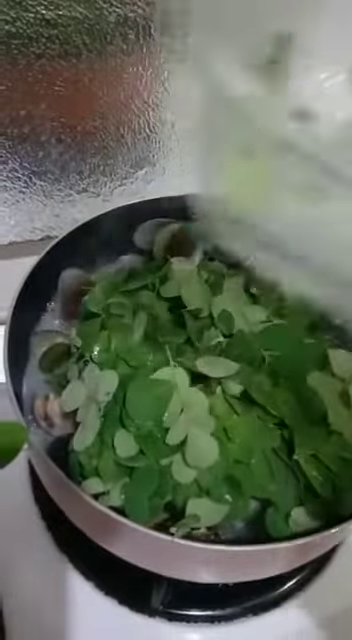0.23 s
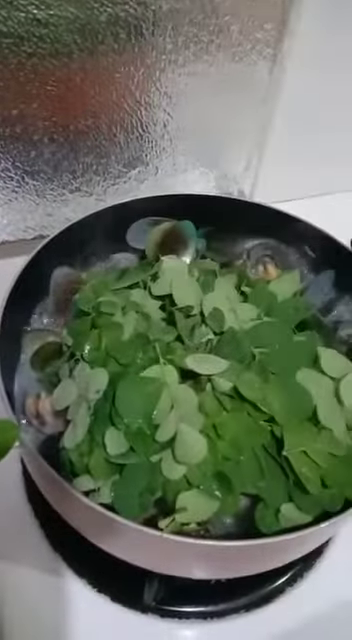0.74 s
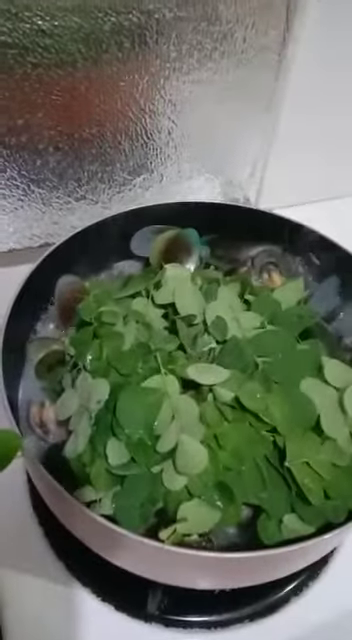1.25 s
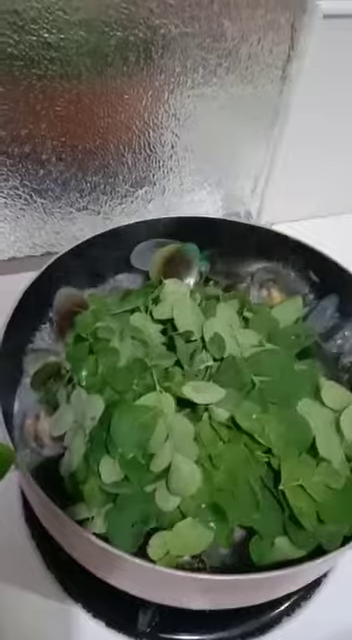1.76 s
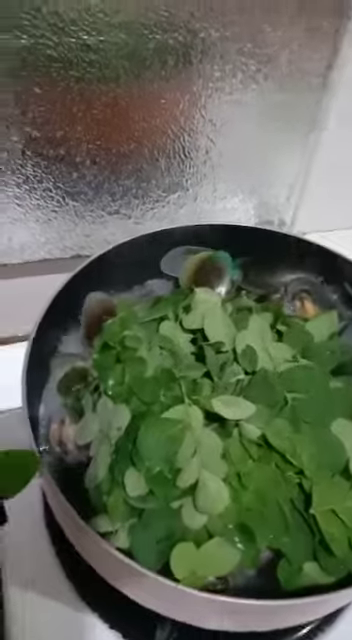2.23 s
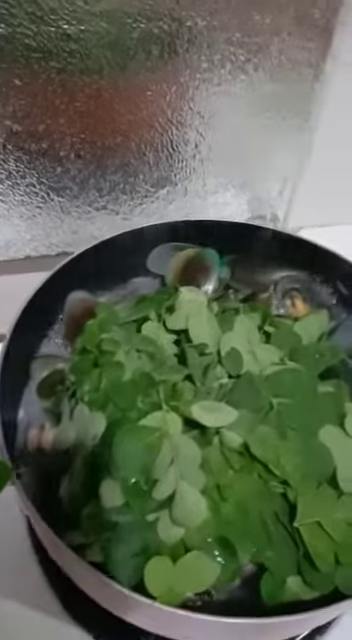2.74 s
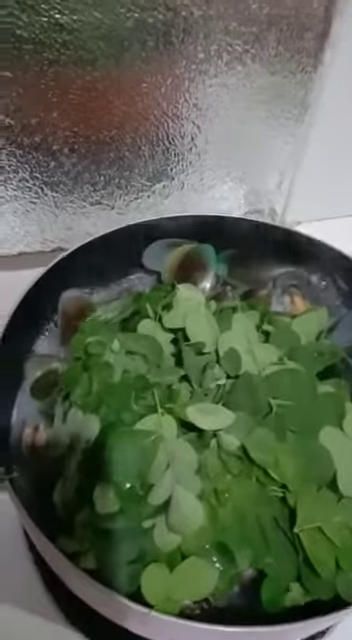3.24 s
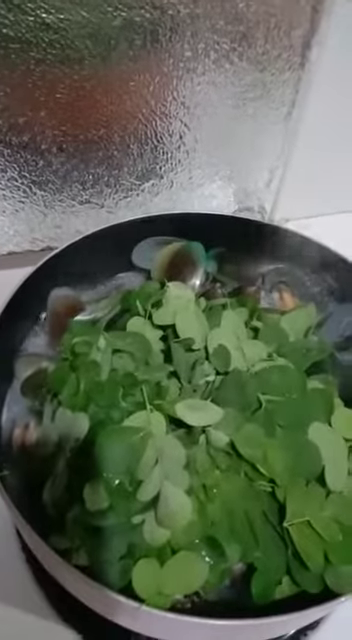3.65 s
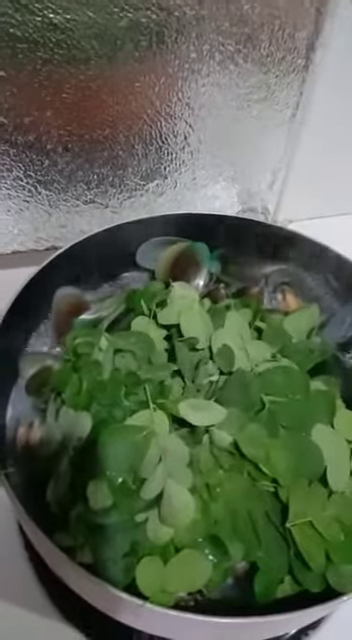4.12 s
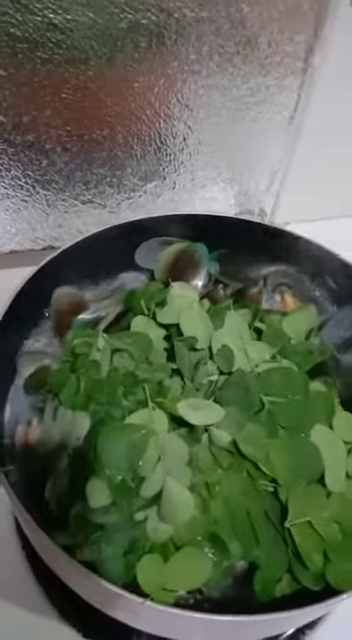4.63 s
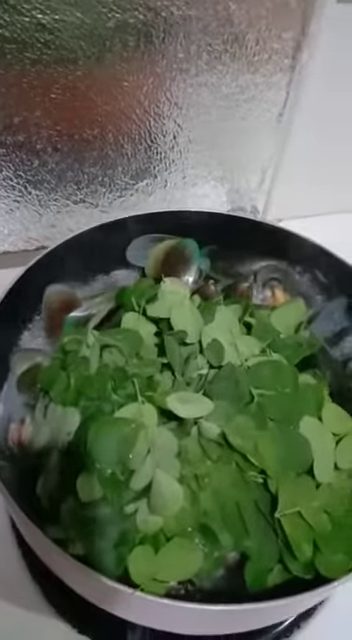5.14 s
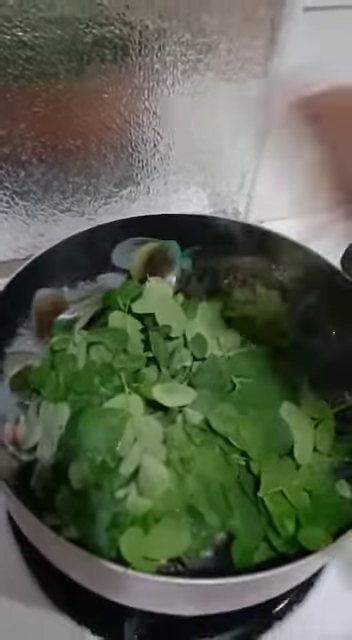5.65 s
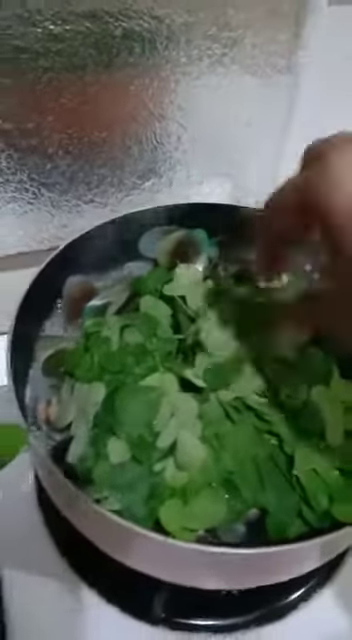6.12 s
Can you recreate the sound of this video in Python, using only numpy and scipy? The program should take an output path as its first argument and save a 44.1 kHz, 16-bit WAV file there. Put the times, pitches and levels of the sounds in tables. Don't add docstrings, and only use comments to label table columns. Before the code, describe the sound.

Faint low hum and gentle boiling run throughout, with hollow plopping bubbles, tiny taps on the pot wall and airy steam. After about a second a metal bowl strikes the counter with one hard, brief clang. Lighter utensil taps and scrapes follow, including two sharp ringing knocks in the middle. The last seconds are mostly bubbling and little spits, heard close on a boxy phone microphone in a tiled kitchen.

```python
import sys
import numpy as np
from scipy import signal
from scipy.fft import rfft, irfft
from scipy.io import wavfile
from scipy.ndimage import uniform_filter1d

SR = 44100
rng = np.random.default_rng(int(sys.argv[2]) if len(sys.argv) > 2 else 0)


def store_wav(level_fs):
    pcm = np.round(np.clip(np.atleast_2d(level_fs), -1, 1) * 32767)
    wavfile.write(sys.argv[1], SR, pcm.T.astype(np.int16))


def gain_from_db(level_db):
    decades = np.asarray(level_db, float) / 20
    return 10 ** decades


N = 281490

# t/s, level/dB
BOIL = [(0.0, -0.5), (0.25, 0.5), (0.57, -8), (1.2, -2.5), (1.5, 6.5), (1.8, -5.5), (2.4, 0.5), (2.63, 0.5),
        (2.95, 8.5), (3.3, 0.5), (4.1, -2), (4.53, -1), (4.85, 7.5), (5.1, -1.5), (5.6, 0), (6.38, -9.5)]
# f/Hz, density/(dB per Hz)
WASH = [(18, -32.5), (30, -29), (124, 2), (184, -30), (239, -7), (426, -10.5), (962, -11.5), (1250, -9.5),
        (1540, -18), (5590, -20.5), (6380, -24), (13300, -40.5), (14800, -26.5), (16000, -32)]
# f/Hz, density/(dB per Hz)
STEAM = [(3240, -38), (5500, -2.5), (6420, -4.5), (7090, 5), (8080, -5.5), (9690, 0), (12500, -13),
         (16200, -40), (22000, -120)]
# t/s, lift/dB
PUFFS = [
    (2.4, -1),
    (3.5, 3.5),
    (4.15, 1.5),
    (4.85, 5),
]
# t/s, length/s, f/Hz, level/dB rms
WHISTLES = [
    (0.812, 0.083, 885, -69),
    (0.875, 0.18, 977, -64),
    (2.733, 0.11, 1024, -62.5),
]
# t/s, level/dB, f/Hz
POPS = [(0.02, -42.5, 1180), (0.194, -41, 1250), (0.2592, -45, 1210), (0.3049, -34, 1217),
        (0.396, -41.5, 1240), (0.51, -42.5, 1195), (0.664, -42, 1284), (0.9152, -38, 1223),
        (1.0096, -39, 1240), (1.126, -40.5, 1260), (1.724, -34.5, 1256), (1.7772, -32.5, 1175),
        (2.254, -42, 1350), (2.4713, -41.5, 1240), (2.6494, -34.5, 1230), (2.8, -39, 1213),
        (2.9368, -32.5, 1224), (2.9878, -27.5, 1245), (3.259, -44, 1286), (3.523, -39, 1270),
        (4.4686, -31.5, 1243), (4.551, -41, 1172), (4.6975, -38.5, 1190), (4.805, -37, 1260),
        (4.9384, -35.5, 1245), (5.035, -38.5, 1242), (5.1937, -37, 1258), (5.71, -37.5, 1228),
        (5.77, -35.5, 1283), (5.927, -37.5, 1254)]
# f/Hz, level/dB rms
PAN_MODES = [(1760, -69), (1880, -69.5), (2270, -70), (2850, -71.5), (3170, -67.5), (3740, -70.5),
             (5080, -69.5), (5620, -72), (7150, -79.5), (9200, -78.5), (10400, -78)]
# f/Hz, width/Hz, lift/dB
HOLLOW = [(1240, 100, 18), (1870, 1400, 11), (3150, 800, 9), (3720, 40, 16), (5630, 1240, 10.5),
          (6370, 490, -21.5), (7700, 170, 17), (7830, 900, -7), (8900, 340, 13)]
# t/s, level/dB, centre f/Hz
THUDS = [
    (.47, -46, 430),
    (1.5, -45.5, 476),
    (2.5, -48, 684),
    (2.57, -46, 610),
    (2.75, -47, 617),
    (2.89, -42, 574),
    (4.94, -47, 354),
    (5.76, -46.5, 408),
    (5.96, -46, 412),
]
# t/s, level/dB
SPITS = [
    (1.724, -57),
    (1.9669, -48),
    (3.4897, -44),
    (3.5294, -52),
    (4.2444, -52),
    (4.787, -43.5),
    (4.878, -45),
    (4.903, -43),
    (6.0935, -59),
]
# f/Hz, level/dB, t60/s, pair split/Hz (negative: starts opposed and swells)
BOWL_MODES = [(1140, -9, 0.16, 24), (1265, -7.5, 0.19, 47), (2160, -21, 0.42, 94), (2620, -3, 0.057, 89),
              (2635, 8, 0.045, 129), (3350, -10.5, 0.31, -6), (3860, -28, 0.052, 22),
              (5070, -13, 0.18, -17), (6750, -4.5, 0.12, -1), (8355, -19, 0.17, 35), (9380, -17, 0.095, 9),
              (9900, -29, 0.18, 12), (10490, -26.5, 0.22, 11), (11570, -37, .18, 10), (12257, -39, .08, 30),
              (14280, -36, 0.12, 12)]
# f/Hz, density/(dB per Hz)
BOWL_CONTACT = [(150, -41), (250, -27), (1270, 8), (1560, -1), (1920, 3.5), (3050, 0), (3380, 0.5),
                (6260, -19), (6940, -35), (7300, -31), (9610, -33), (15000, -78)]
# t/s, ring level/dB, crack level/dB, hardness/(dB per octave)
BOWL_HITS = [
    (1.3178, -19, -2.5, -0.63),
    (1.863, -57, -55, -0.5),
    (3.985, -60.5, -60, 7),
]
# f/Hz, level/dB, t60/s, pair split/Hz
LADLE_MODES = [(524, -34, 0.53, 5.9), (643.6, -22, 0.28, 4.8), (893, -41, 0.11, 9.8), (1111, -6, 0.14, 26),
               (1256, -2.5, 0.041, 4.9), (1850, -9, 0.24, 5), (2680, -49, 0.075, 22), (3350, -16, 0.075, 4),
               (3690, -8.5, 0.039, 5), (4620, -31, 0.13, 50)]
# f/Hz, density/(dB per Hz)
LADLE_CONTACT = [(180, -27), (300, -24.5), (1150, 0), (1610, -12), (2690, -10.5), (3090, -26), (3660, -1),
                 (4140, -27), (9670, -25), (12000, -66), (15600, -98), (22000, -120)]
# t/s, ring level/dB, crack level/dB, hardness/(dB per octave)
LADLE_HITS = [
    (1.876, -37, -41, -4.5),
    (1.888, -54, -36, -3),
    (2.037, -40.5, -46, -1.5),
    (2.052, -48, -35, -4.5),
    (3.086, -41, -31.5, -4),
    (3.382, -28, -36, 1),
    (3.558, -46.5, -35.5, -4.5),
    (3.728, -51.5, -50, -7),
    (3.9915, -30, -29, -2),
    (4.119, -49, -35, -9),
]
# t/s, level/dB, f/Hz
CLONKS = [
    (3.3826, -14.5, 1000),
    (3.9924, -17, 1050),
]
# t/s, level/dB, f/Hz, ring/s
PINGS = [(1.34, -36.5, 3335, 0.24), (1.862, -52, 9330, 0.026), (1.863, -60, 11640, .025),
         (1.953, -37.5, 3430, .04), (1.99, -41.5, 3350, .03), (2.056, -46, 1850, .13),
         (2.711, -48, 3150, 0.015), (3.079, -48, 5130, 0.018), (3.08, -58, 9900, .025),
         (3.382, -48.5, 8300, 0.014), (3.384, -57, 10100, .015), (3.978, -39, 3700, 0.04),
         (3.982, -49, 8400, 0.018), (3.991, -49, 9560, .023)]
# t/s,
# level/dB, centre f/Hz
KNOCKS = [(0.402, -46.5, 3350), (0.49, -46, 1450), (1.052, -45, 3000), (1.3175, -7.5, 2430),
          (1.5723, -44, 2030), (1.774, -42, 2040), (1.862, -39, 1230), (1.875, -28, 1910),
          (1.956, -34, 3500), (2.28, -41, 1090), (2.6743, -40, 4440), (2.806, -41.5, 1870),
          (2.899, -44, 2250), (2.972, -42, 1880), (2.998, -47, 1810), (3.014, -36.5, 1960),
          (3.079, -34, 2260), (3.601, -36.5, 2840), (3.726, -42.5, 1940), (4.3385, -36.5, 2100),
          (4.461, -46, 1850), (4.517, -43, 2030), (4.793, -46, 5700), (4.884, -54, 14000),
          (4.939, -46, 1740), (5.196, -41.5, 2130), (5.768, -45, 1700), (5.94, -44.5, 1580),
          (6.095, -57, 13500)]
# t/s, level/dB, centre f/Hz
SCRAPES = [
    (1.953, -39, 4040),
    (2.975, -33.5, 660),
    (2.978, -34.5, 2030),
    (3.08, -42, 2000),
    (3.09, -47, 5200),
    (3.09, -41, 724),
    (3.385, -37, 2860),
    (3.6, -45, 410),
    (3.997, -45, 2500),
]
# f/Hz, t60/s
KITCHEN = [(300, 1), (1000, 0.31), (2500, 0.24), (5000, 0.27), (10000, 0.29)]
# f/Hz, steady level/dB rms, wavering level/dB rms, wavering width/Hz
HUM = [(57.8, -68, -81, 3.7), (121.4, -61, -59, 38), (239.4, -63.5, -65, 30.5), (355, -85, -66.5, 20.7),
       (623, -102, -67, 135)]
# f/Hz, density/(dB per Hz)
SIDE_HISS = [(29, -40), (55, -10), (122, -2), (809, -8.5), (1250, 2), (1550, -9.5), (5520, -18.5),
             (7020, -29), (15500, -20.5)]


def evened(x):
    return x / np.sqrt(np.mean(x ** 2) + 1e-20)


def read(points, hz):
    f, value = np.transpose(points)
    return np.interp(np.log(hz + 1), np.log(f + 1), value)


def add(mix, start_s, sound):
    part = mix[round(start_s * SR):][:len(sound)]
    part += sound[:len(part)]


def hollow_db(hz):
    return sum(lift_db / (1 + (2 * (hz - f) / width_hz) ** 2) for f, width_hz, lift_db in HOLLOW)


def causal(gain_db, size=2048):
    log_gain = np.log(gain_from_db(np.maximum(gain_db, -100)))
    whole = np.concatenate([log_gain, log_gain[-2:0:-1]])
    taps = np.fft.ifft(np.exp(np.conj(signal.hilbert(whole)))).real[:size]
    return taps / np.linalg.norm(taps)


def noise(shape_db, patchy_db, flicker_db, size=512):
    frames, hz = 4 * N // size + 5, np.fft.rfftfreq(size, 1 / SR)
    re, im, patches = rng.standard_normal((frames, len(hz), 3)).T
    patches = uniform_filter1d(patches, size=5, axis=0)
    patches = evened(uniform_filter1d(patches, size=8, axis=1))
    flicker = evened(uniform_filter1d(rng.standard_normal(frames), size=4))
    level_db = shape_db(hz)[:, None] + patchy_db * patches + flicker_db * flicker
    spectra = (re + 1j * im) * gain_from_db(level_db)
    return evened(signal.istft(spectra, nperseg=size, noverlap=3 * size // 4)[1][:N])


def bubble(hz, cycles, glide):
    u = np.arange(6000) / SR * hz / cycles
    tone = np.sin(2 * np.pi * cycles * (u + glide * u ** 2))
    return tone * np.exp(-u * 3) * (1 - np.exp(-u * 18))


def burst(colour_db, length_s, chance, rise=3.55):
    u = np.arange(len(chance)) / SR / length_s
    shape = np.exp(-u * 1.17) * np.minimum(u * rise + 0.15, 1)
    spectrum = rfft(chance * shape)
    lumps = uniform_filter1d(abs(spectrum) ** 2, size=len(chance) // 150)
    even = irfft(spectrum / np.sqrt(lumps), len(chance))
    sound = signal.fftconvolve(even * shape, causal(colour_db))
    return sound / abs(sound).max()


def boil(share):
    return gain_from_db(share * np.interp(np.arange(N) / SR, *np.transpose(BOIL)))


def bubbling():
    per_s = 260
    size = gain_from_db(3.6 * np.minimum(rng.exponential(1, N), 5)) * (rng.random(N) < per_s / SR)
    kind, crowd = rng.integers(0, 22, N), 0
    for k, hz in enumerate(np.geomspace(300, 6000, 22)):
        level = gain_from_db(0.95 * hollow_db(hz) - 0.85 * np.log2(hz / 1000))
        voice = level * bubble(hz, cycles=21.6, glide=0.0055)
        crowd = crowd + signal.oaconvolve(size * (kind == k), voice)[:N]
    near = noise(lambda hz: -25 * np.log10(1 + (2 * (hz - 1240) / 120) ** 2),
                 patchy_db=1.5, flicker_db=1.5, size=1024)
    return gain_from_db(-54.5) * boil(0.83) * (gain_from_db(-7) * evened(crowd) + gain_from_db(-5) * near)


def wash():
    water = noise(lambda hz: read(WASH, hz) + 0.51 * hollow_db(hz), patchy_db=1.5, flicker_db=1.4, size=1024)
    return gain_from_db(-57) * boil(0.083) * water


def gurgle():
    return gain_from_db(-64.5) * noise(lambda hz: -7 * np.log2(hz / 170 + 0.0091) ** 2,
                              patchy_db=4, flicker_db=0.5, size=2048)


def steam():
    t, puff_s, grows_db_per_s = np.arange(N) / SR, 0.23, 0.4
    puffs_db = sum(lift_db * np.exp(-((t - s) / puff_s) ** 2) for s, lift_db in PUFFS)
    hiss = noise(lambda hz: read(STEAM, hz), patchy_db=3.3, flicker_db=1.2, size=256)
    return gain_from_db(-71.5 + grows_db_per_s * t + puffs_db) * hiss


def pops():
    out = np.zeros(N)
    for s, db, hz in POPS:
        add(out, s, gain_from_db(db - 2.5) * bubble(hz, cycles=32, glide=0.016))
    return out


def pan_rings():
    per_s = 300
    size = gain_from_db(3.1 * np.minimum(rng.exponential(1, N), 4)) * (rng.random(N) < per_s / SR)
    modes = list(PAN_MODES) * 2
    kind, out = rng.integers(0, len(modes), N), 0
    for k, (hz, db) in enumerate(modes):
        ring = bubble(hz * rng.uniform(0.99, 1.015), cycles=0.055 * hz, glide=0)
        out = out + gain_from_db(db - 9) * evened(signal.oaconvolve(size * (kind == k), ring)[:N])
    return out


def whistles():
    out = np.zeros(N)
    for s, length_s, hz, db in WHISTLES:
        t = np.arange(0, length_s, 1 / SR)
        tone = np.sqrt(2) * np.sin(2 * np.pi * hz * t)
        add(out, s, gain_from_db(db) * tone * signal.windows.tukey(len(t), 0.4))
    return out


def strikes(hits, modes, contact, contact_s, chatter_s, lift_db, lag_s):
    out, hz, t = np.zeros(N), np.fft.rfftfreq(4096, 1 / SR), np.arange(SR // 2) / SR
    f, mode_db, t60, split = np.transpose(modes)[:, :, None]
    ring_rise = np.sin(np.minimum(t / 0.0026, 1) * np.pi / 2) ** 2
    for s, ring_db, crack_db, tilt in hits:
        crack_chance, chatter_chance = rng.standard_normal((2, 12000))
        phase = rng.random((len(f), 1))
        crack_colour_db = read(contact, hz) + tilt * np.log2(hz / 2000 + 0.0068)
        chatter_colour_db = crack_colour_db - 5.2 * np.log2(1 + hz / 3000) ** 2
        crack = burst(crack_colour_db, contact_s, crack_chance[:3000], rise=10.6)
        chatter = burst(chatter_colour_db, chatter_s, chatter_chance, rise=73)
        pair = np.sin(2 * np.pi * (f * t + phase))
        pair = pair + 0.5 * np.sign(split) * np.sin(2 * np.pi * ((f + split) * t + phase))
        ring = gain_from_db(mode_db + tilt * np.log2(f / 2000) - 60 * t / t60) * pair
        add(out, s, gain_from_db(crack_db) * crack)
        add(out, s + lag_s, gain_from_db(ring_db + lift_db) * chatter)
        add(out, s, gain_from_db(ring_db) * ring.sum(0) * ring_rise)
    return out


def bowl():
    return strikes(BOWL_HITS, BOWL_MODES, BOWL_CONTACT,
                   contact_s=0.0092, chatter_s=0.13, lift_db=2, lag_s=0.00103)


def utensil():
    return strikes(LADLE_HITS, LADLE_MODES, LADLE_CONTACT,
                   contact_s=0.0028, chatter_s=0.038, lift_db=3.5, lag_s=0.008)


def clonks():
    out = np.zeros(N)
    for s, db, hz in CLONKS:
        add(out, s, gain_from_db(db) * bubble(hz, cycles=7.9, glide=0))
    return out


def pings():
    out = np.zeros(N)
    for s, db, hz, ring_s in PINGS:
        add(out, s, gain_from_db(db) * bubble(hz, cycles=ring_s * hz, glide=0))
    return out


def knocks(rows, spread_octaves, length_s):
    out, hz = np.zeros(N), np.fft.rfftfreq(4096, 1 / SR)
    for s, db, centre_hz in rows:
        band_db = -9 * (np.log2(hz / centre_hz + 0.001) / spread_octaves) ** 2
        sound = burst(band_db + 0.55 * hollow_db(hz), length_s, rng.standard_normal(6000))
        add(out, s, gain_from_db(db - 3) * sound)
    return out


def small_contacts():
    spits = [(s, db, 8900) for s, db in SPITS]
    counter = knocks(KNOCKS, spread_octaves=0.47, length_s=0.015)
    counter = counter + knocks(SCRAPES, spread_octaves=0.69, length_s=0.058)
    pot = knocks(THUDS, spread_octaves=0.26, length_s=0.014)
    return counter + pot + knocks(spits, spread_octaves=0.33, length_s=0.012)


def kitchen(x):
    taps = np.zeros(SR)
    at = np.arange(200, SR - 20, 20)
    taps[at + rng.integers(0, 20, len(at))] = rng.choice([-1., 1.], len(at))
    hz, t, spectra = signal.stft(taps, SR, nperseg=256)
    decay_db = -60 * t / read(KITCHEN, hz)[:, None]
    colour_db = 0.47 * hollow_db(hz)[:, None]
    tail = signal.istft(spectra * gain_from_db(decay_db + colour_db), SR, nperseg=256)[1]
    return signal.fftconvolve(x, tail / np.linalg.norm(tail))[:N]


def hum():
    t, out = np.arange(N) / SR, 0
    throb_db, throb_hz = 2.6, 11
    for hz, steady_db, waver_db, width_hz in HUM:
        r, (re, im) = np.exp(-np.pi * width_hz / SR), rng.standard_normal((2, N))
        waver = signal.lfilter([1], np.convolve([1, -r], [1, -r]), re + 1j * im)
        carrier = np.exp(2j * np.pi * (hz * t + rng.random()))
        throb = evened(np.interp(t * throb_hz, np.arange(80), rng.standard_normal(80)))
        steady = gain_from_db(steady_db) * np.sqrt(2) * carrier.real
        wavering = gain_from_db(waver_db) * evened((waver * carrier).real)
        out = out + gain_from_db(throb_db * throb - 1) * (steady + wavering)
    return out


def side_hiss():
    return gain_from_db(-75.5) * noise(lambda hz: read(SIDE_HISS, hz), patchy_db=1, flicker_db=1)


def scene():
    pot = bubbling() + wash() + gurgle() + steam() + pan_rings()
    metal = bowl() + utensil()
    small = small_contacts()
    tones = pops() + pings() + clonks() + whistles()
    room = kitchen(gain_from_db(-8.5) * metal + gain_from_db(-5.5) * small + gain_from_db(-12) * tones)
    mid = pot + metal + small + tones + room + hum()
    side = side_hiss()
    return np.array([mid + side, mid - side])


def roll_off(x):
    return signal.sosfilt(signal.butter(12, 16450, fs=SR, output="sos"), x)


def record(dry):
    dry = signal.sosfilt(signal.butter(4, 46, "high", fs=SR, output="sos"), dry)
    dry = 0.75 * np.tanh(dry / 0.75)
    lowpass = signal.firwin(401, 15600, window=("kaiser", 9), fs=SR)
    mix = signal.oaconvolve(dry, lowpass[None], "same")
    return roll_off(mix)


dry = scene()
out = record(dry)
store_wav(out)
```